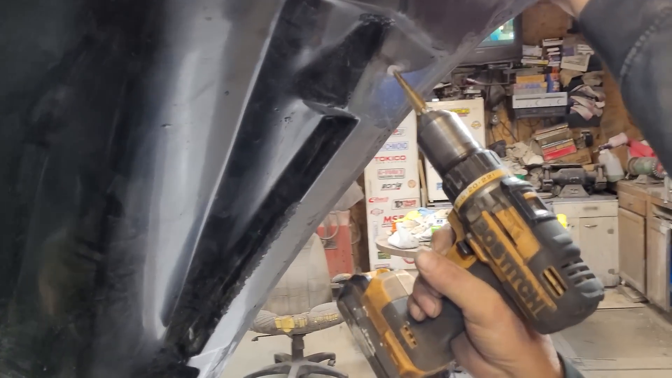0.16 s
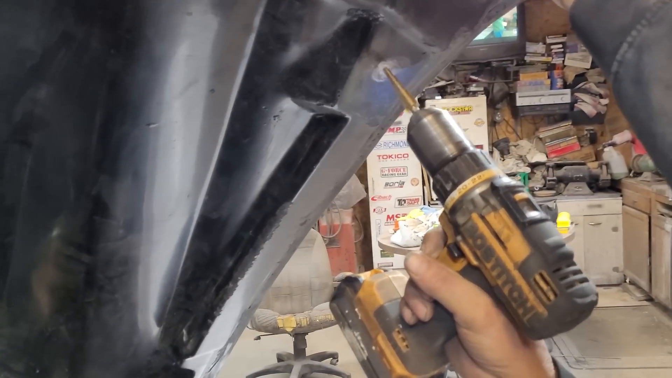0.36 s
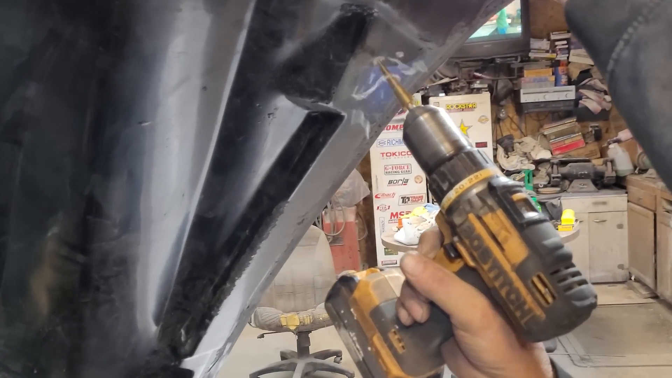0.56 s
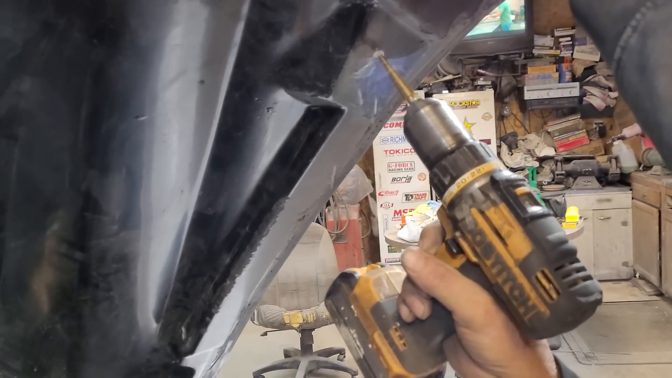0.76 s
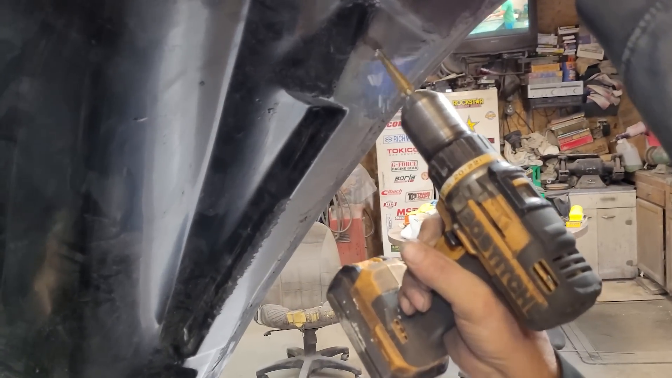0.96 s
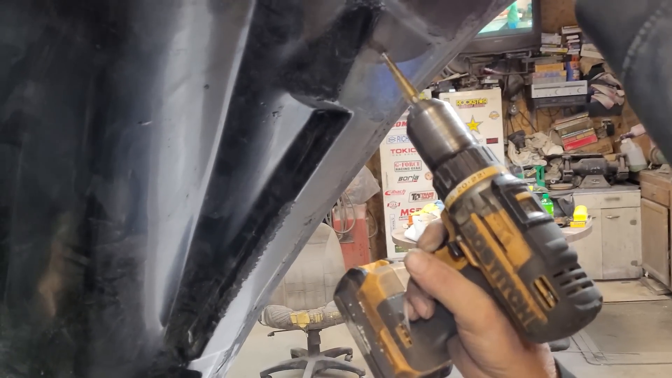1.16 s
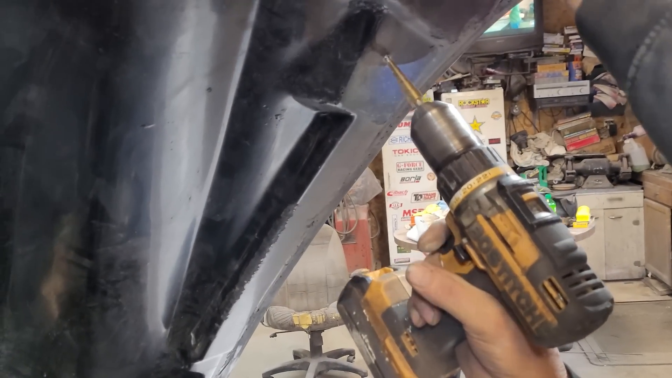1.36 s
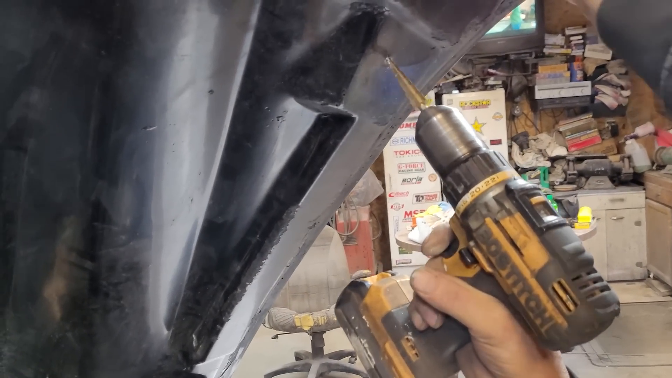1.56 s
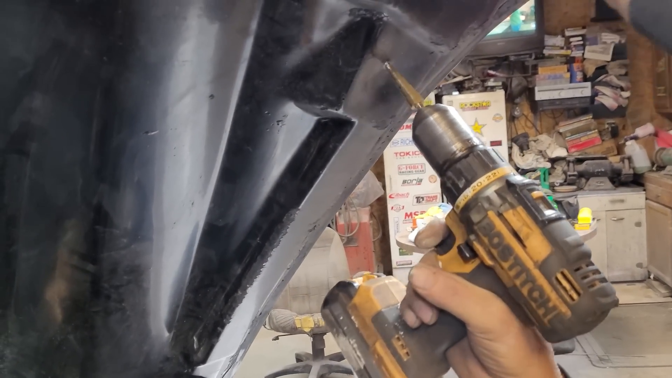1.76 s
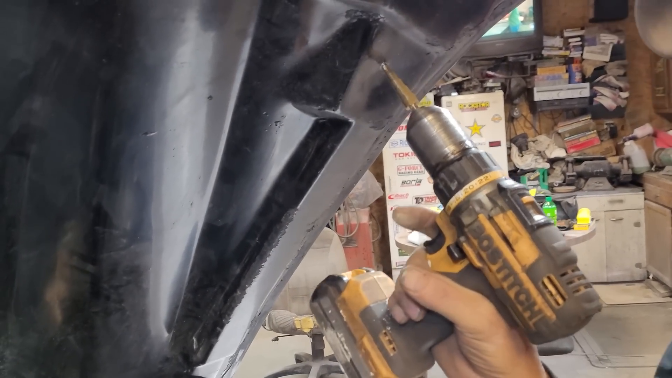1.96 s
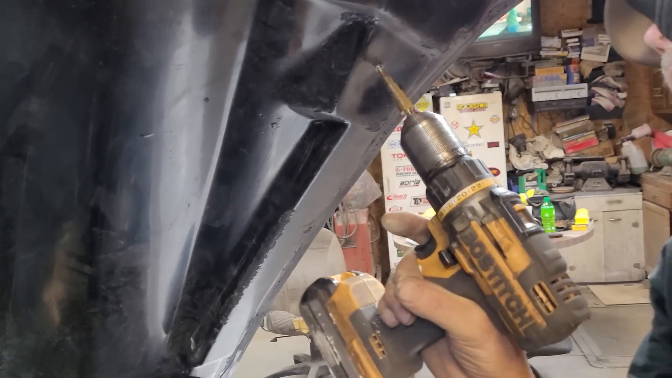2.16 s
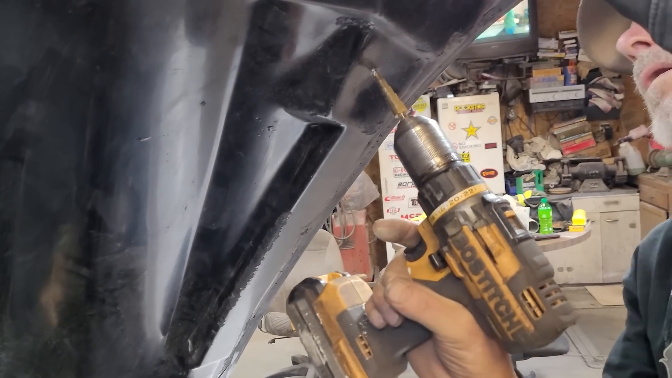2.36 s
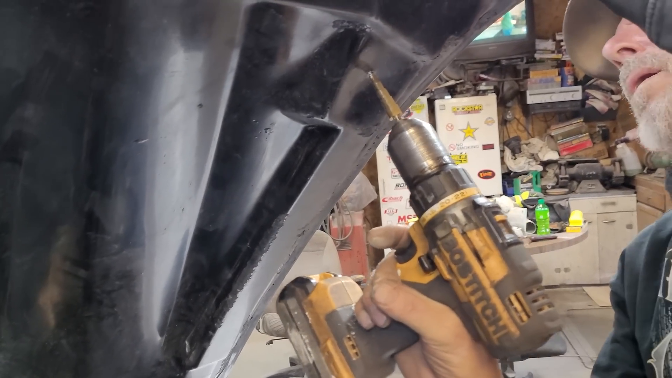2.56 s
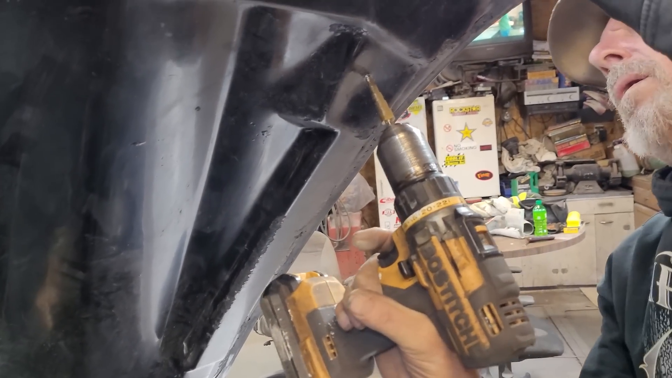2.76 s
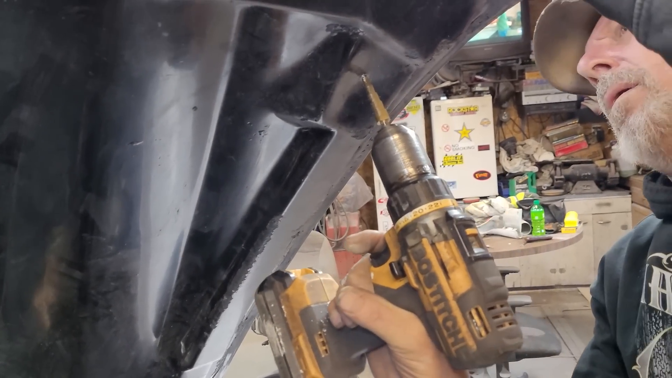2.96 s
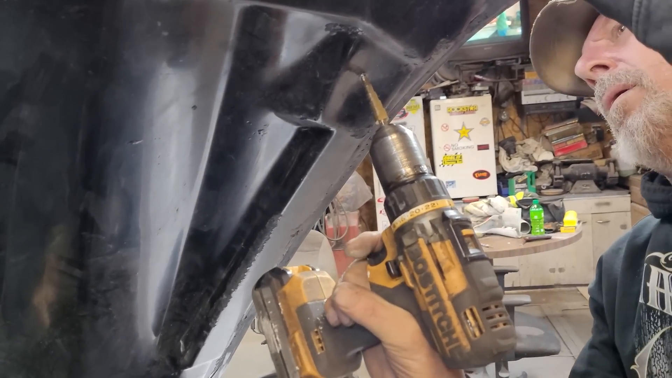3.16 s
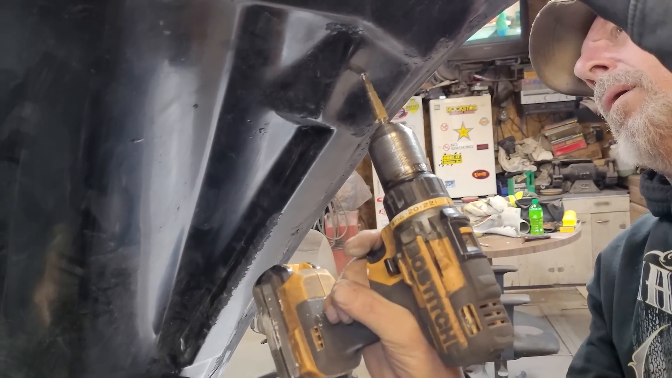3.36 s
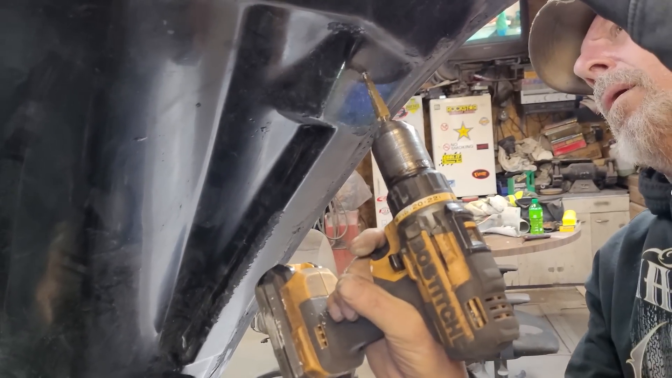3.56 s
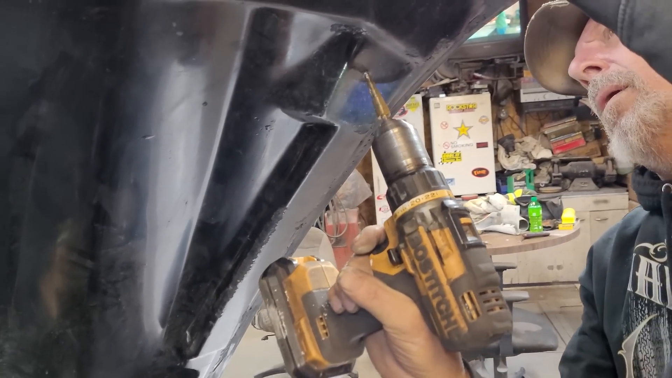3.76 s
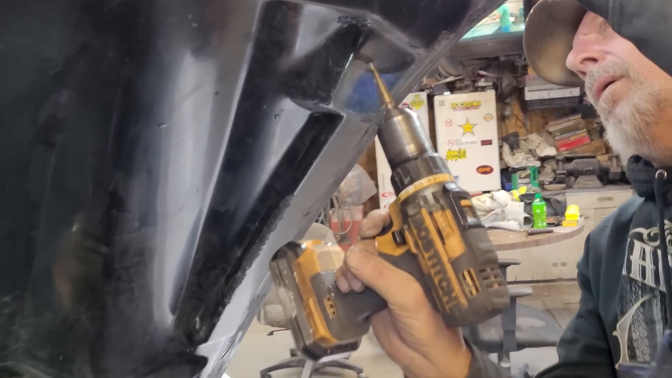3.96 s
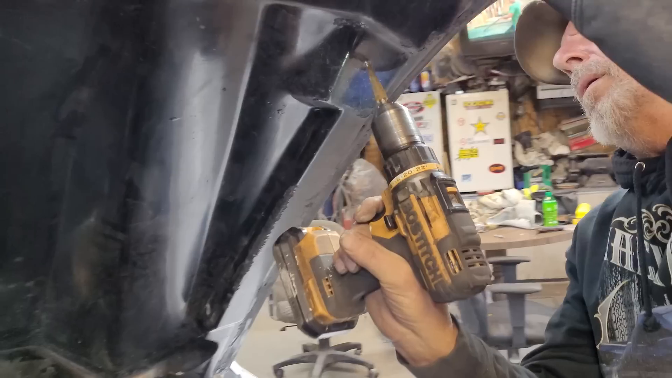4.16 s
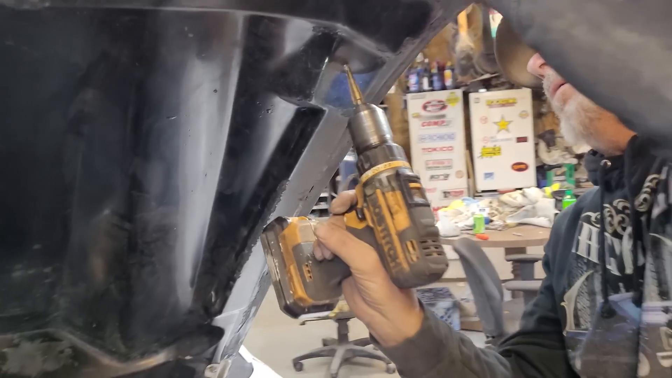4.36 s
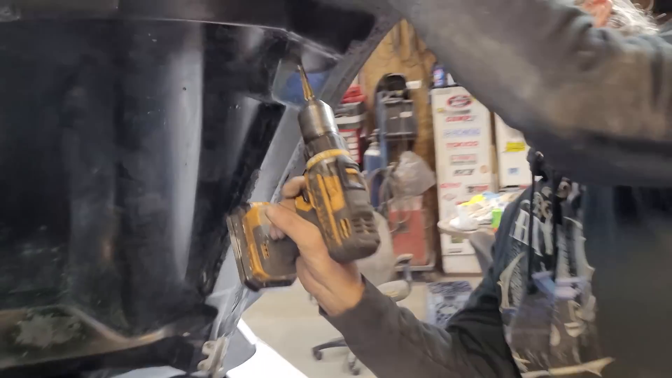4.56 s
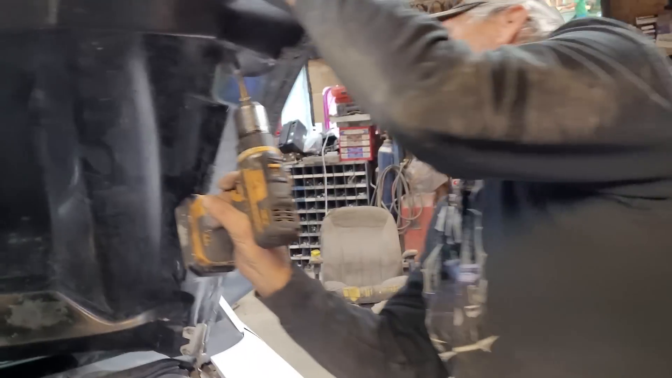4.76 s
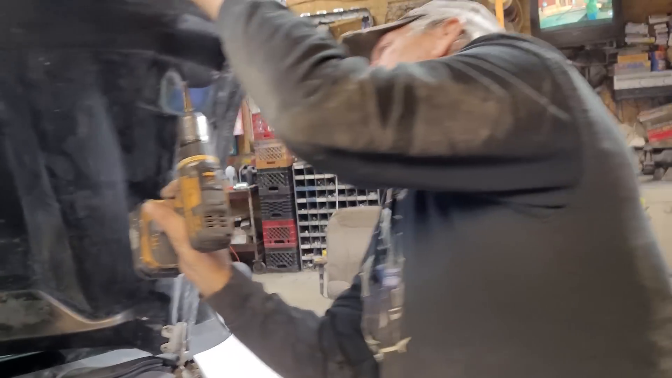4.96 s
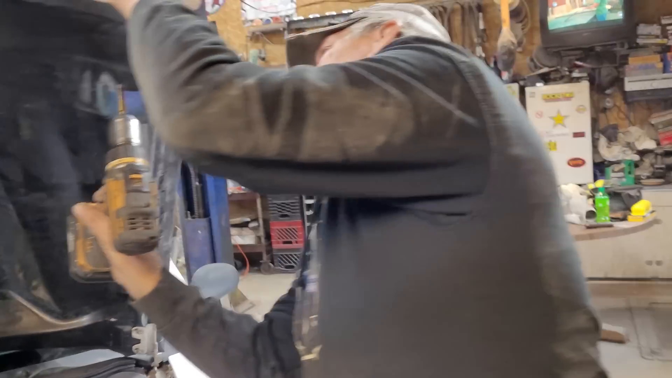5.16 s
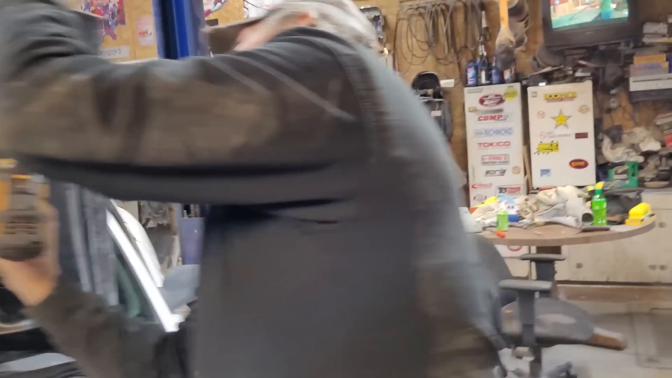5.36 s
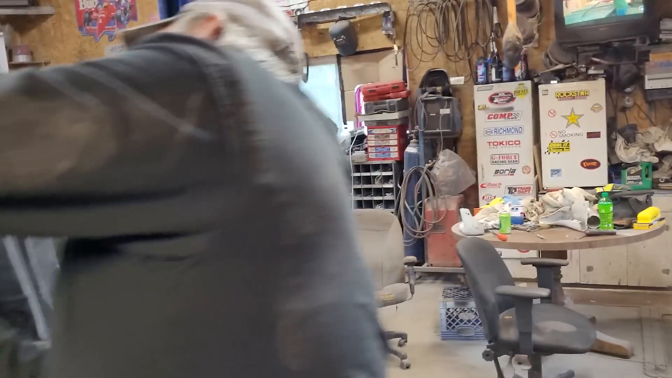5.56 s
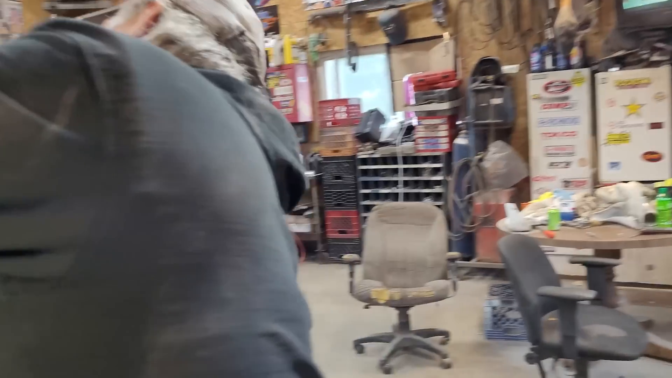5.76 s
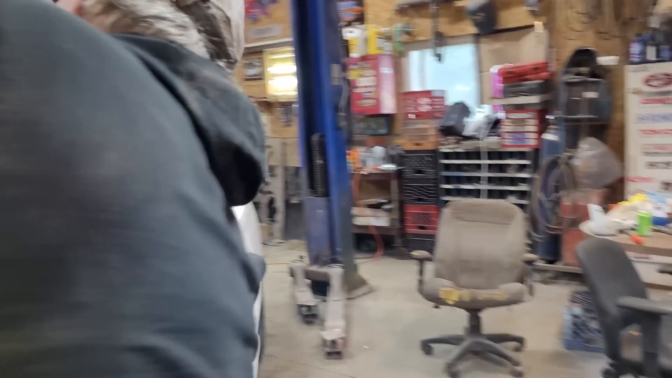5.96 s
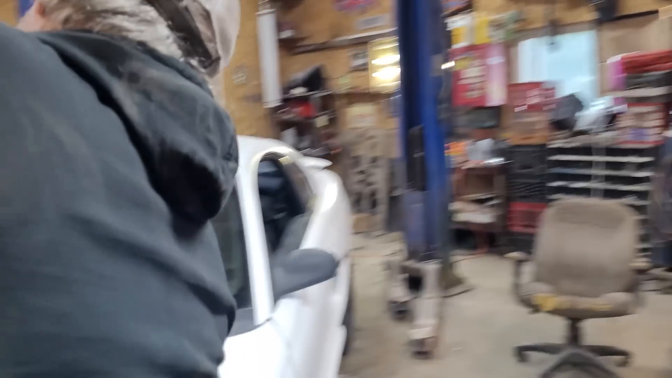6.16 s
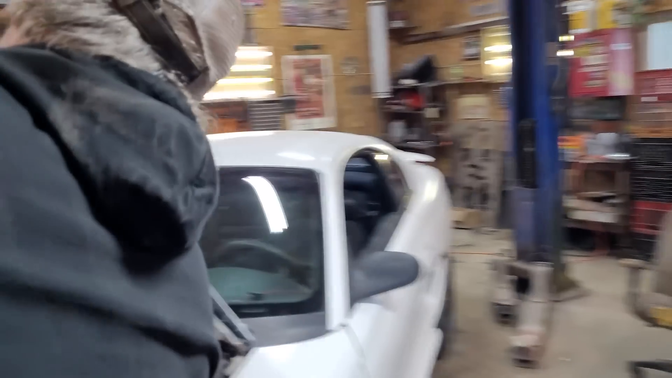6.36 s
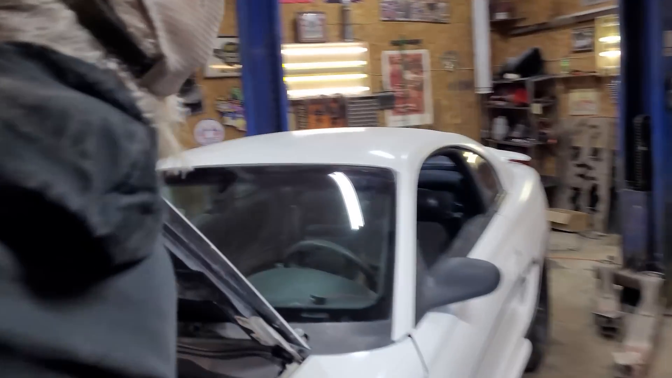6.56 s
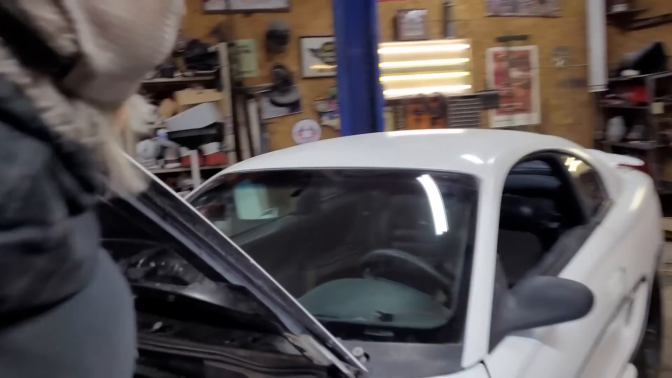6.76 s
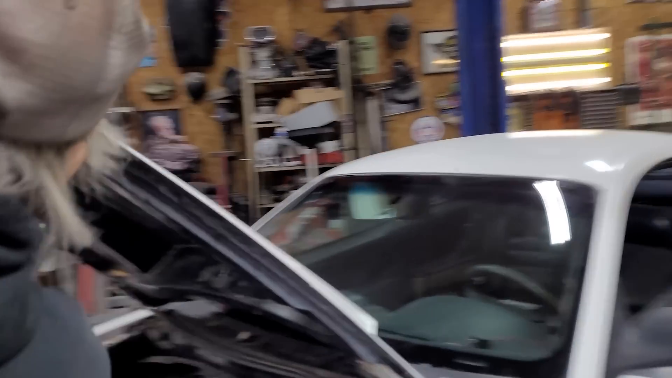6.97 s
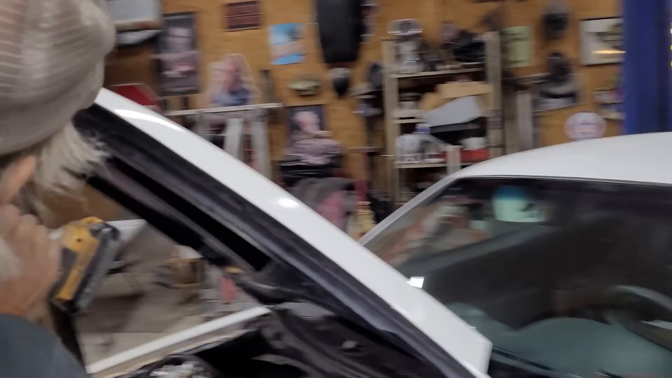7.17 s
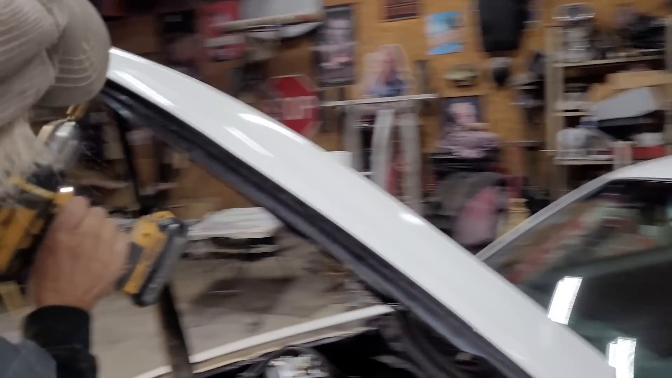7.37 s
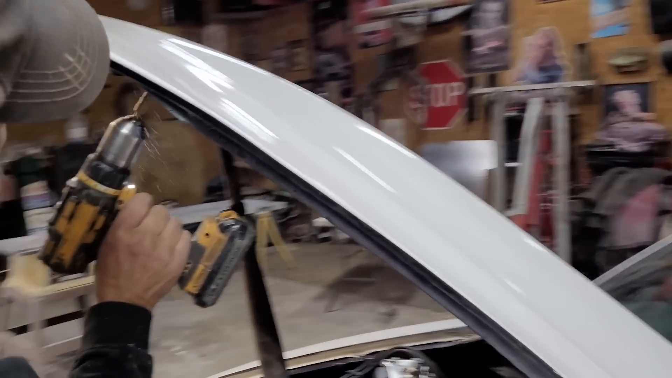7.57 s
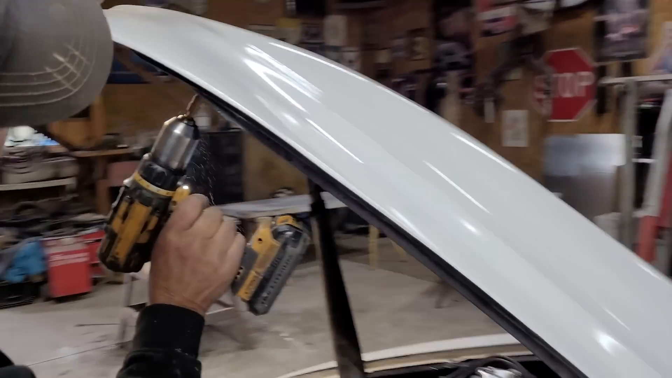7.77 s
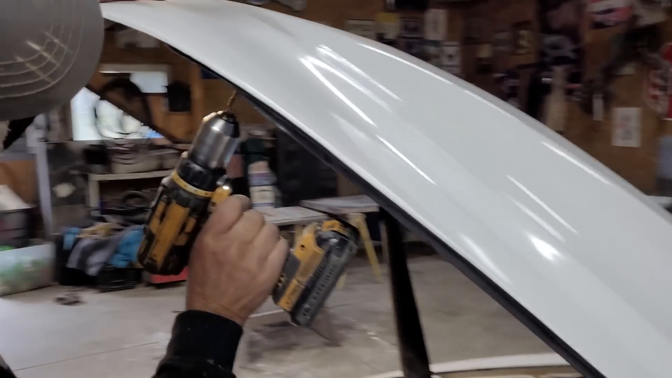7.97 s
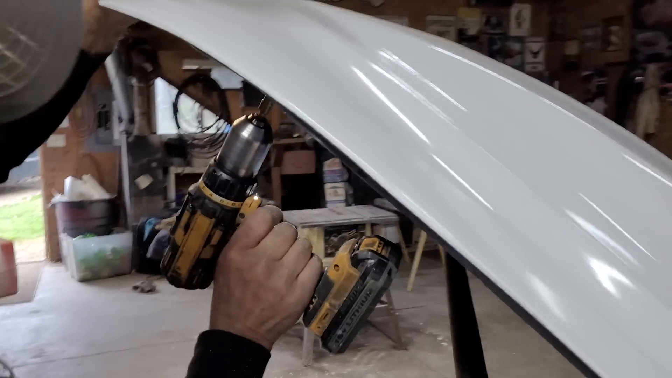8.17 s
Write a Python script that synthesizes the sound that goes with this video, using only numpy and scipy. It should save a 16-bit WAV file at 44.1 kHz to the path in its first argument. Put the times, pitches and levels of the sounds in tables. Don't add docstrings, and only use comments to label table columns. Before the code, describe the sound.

Handheld phone close to a drill on a car hood. The motor whines steadily while the thin panel drones and buzzes, then the pitch falls away with clanking catches. For two seconds only tip scuffs, grainy dragging, a tiny squeak and dull hand bumps remain over faint room noise. Drilling resumes lower and rougher, then surges to full speed, treble sweeping as the phone moves, until the bit snaps through and spins looser.

```python
import sys
import numpy as np
from scipy import signal
from scipy.fft import rfft, irfft, next_fast_len
from scipy.io import wavfile
from scipy.ndimage import uniform_filter1d, map_coordinates

SR = 44100
rng = np.random.default_rng(int(sys.argv[2]) if len(sys.argv) > 2 else 0)


def file_out(sig):
    cols = np.atleast_2d(sig).T
    lim = np.clip(cols, -1, 1)
    pcm = np.round(lim * 32767).astype(np.int16)
    wavfile.write(sys.argv[1], SR, pcm)


def linear_from_db(decibels):
    return 10 ** (np.asarray(decibels, float) / 20)


N = 362943
MESH_PER_ROTOR, MESH_PER_FLUTE = 12, 89.9
SHOP_T60_S, NEAR_T60_S = .35, .05

# (time [s], gear mesh [Hz], mesh whine [dB])
THROTTLE_STAGES = [
    [(0, 3941, -33), (.26, 3925, -44.5), (.5, 3943, -40), (1.07, 3925, -45), (1.19, 3591, -39.5),
     (1.31, 3560, -44), (1.45, 2970, -41.5), (1.76, 1767, -44), (1.8, 1520, -73)],
    [(3.88, 1900, -90), (3.94, 1850, -43), (4.0, 1958, -37), (4.12, 2152, -39.5), (4.5, 2385, -39),
     (4.7, 2305, -46.5), (4.9, 2242, -52), (4.97, 2603, -55), (5.28, 2640, -57)],
    [(5.29, 3860, -53), (5.42, 3883, -37), (5.7, 3915, -39), (6.2, 3917, -45), (6.8, 3888, -45),
     (6.97, 3915, -39.5), (7.5, 3837, -34.5), (7.76, 4023, -38.5), (8.23, 4013, -42)],
]
# (frequency [Hz], width [Hz], level [dB])
BOOM_MODES = [(164.7, 12, -3), (211, 11, -4), (234.9, 11, 3.5), (255, 20, 5), (276.4, 13, 1.5),
              (300, 26, -3), (337.3, 14, 0.5), (390.4, 10, -4), (439, 11, -17)]
# (time [s], left lag [samples], left minus right
# [dB], shading by a shoulder [dB])
DRILL_BEARING = [(0, 4, -3, 0), (.7, -2.5, 0.5, -2), (1.2, -14.5, -1, 0.5), (2, -5, -1, -5.5),
                 (2.7, 10, -1.5, -9), (3.3, -1, -2, -7), (3.42, 8.5, 12.5, -9), (3.65, -5.5, -2, -5.5),
                 (4.7, -4, -1, 1), (5.7, -17, -1, 5), (6.3, -14, -0.5, -3.5), (7.3, -10, -1, -2.5),
                 (8.2, -8, -1, 1.5)]
# (time [s], extra path [ms], share left [1], share right [1], rotor orders [dB])
HOOD_MIRROR = [(5.05, .8, 0, 0, -5), (5.2, .7, .6, .1, 0), (5.35, .56, .7, .1, 3), (5.5, .47, .7, .2, 2),
               (5.7, .4, .7, .2, 2), (5.9, .38, .7, .1, 2), (6.2, .33, .5, 0, -2), (6.35, .31, 0, 0, -6),
               (6.9, .27, 0, 0, -7), (7.3, .225, .3, .3, -7), (7.8, .195, .35, .35, -7),
               (8.23, .18, .15, .15, -7)]


def in_time(rows):
    s, *columns = np.transpose(rows)
    return [np.interp(np.arange(N) / SR, s, c) for c in columns]


def rms_one(x):
    return x / np.sqrt(np.mean(x ** 2) + 1e-20)


def at_hz(points, hz):
    point_hz, value = np.transpose(points)
    return np.interp(np.log(hz + 1), np.log(point_hz), value)


def drift(rate_hz):
    r = np.exp(-80 * np.pi * rate_hz / SR)
    slow = signal.lfilter([1], [1, -2 * r, r * r], rng.standard_normal(N // 40 + 2002))[2000:]
    return np.interp(np.arange(N) / 40, np.arange(len(slow)), rms_one(slow))


def coloured(spectrum):
    size = next_fast_len(N)
    hz = np.fft.rfftfreq(size, 1 / SR)
    (low_hz, low_db), (high_hz, high_db) = spectrum[0], spectrum[-1]
    ends = [(low_hz * .8, low_db - 30), *spectrum, (high_hz * 1.2, high_db - 30)]
    white = rfft(rng.standard_normal(size))
    return rms_one(irfft(white * linear_from_db(at_hz(ends, hz)), size)[:N])


def body(force, modes):
    out = 0
    for k, (hz, width_hz, db) in enumerate(modes):
        r = np.exp(-np.pi * width_hz / SR)
        zeros = [(1 - r * r) / 2, 0, -(1 - r * r) / 2]
        poles = [1, -2 * r * np.cos(2 * np.pi * hz / SR), r * r]
        out = out + (-1) ** k * linear_from_db(db) * signal.lfilter(zeros, poles, force + 1e-18)
    return out


def motor_speed():
    spin_up_s = .055
    first, *later = THROTTLE_STAGES
    stop_s, start_s = first[-1][0], later[0][0][0]
    still = [(stop_s + .05, 0, -120), (start_s - .08, 0, -120), (start_s - .002, 0, -60)]
    asked_hz, mesh_db = in_time(np.vstack([first, still, *later]))
    r = np.exp(-1 / (spin_up_s * SR))
    mesh_hz = signal.lfilter([1 - r], [1, -r], asked_hz, zi=[r * asked_hz[0]])[0]
    return mesh_hz, mesh_db


def effort():
    # (time [s], feed of the bit into the panel [dB], motor [dB])
    stages = [
        [(0, -30.5, -30.5), (.8, -25, -30.5), (.95, -22, -28.5), (1.12, -21.5, -33), (1.26, -29.5, -35.5),
         (1.48, -37, -36), (1.54, -22.5, -33.5), (1.785, -27, -38), (1.805, -30.5, -48)],
        [(3.8, -81, -101), (3.812, -54.5, -68), (3.84, -43, -36), (3.91, -32, -34), (4.01, -25.5, -35),
         (4.5, -22, -37), (5.02, -24, -42), (5.28, -22.5, -40.5)],
        [(5.44, -20, -38), (5.6, -22.5, -40), (5.97, -27, -41), (6.3, -25.5, -41), (6.67, -27.5, -40),
         (7.2, -25, -40), (7.55, -28, -34), (7.66, -21, -37.5), (7.86, -31, -38.5), (8.23, -29.5, -36.5)],
    ]
    panel_settles_db_per_s, motor_dies_db_per_s = 39, 140
    first, *later = stages
    s, feed_db, motor_db = first[-1]
    quiet = (s + 1, feed_db - panel_settles_db_per_s, motor_db - motor_dies_db_per_s)
    return in_time(np.vstack([first, quiet, *later]))


def jolts():
    # (time [s], ring [dB], sway [dB], fade [s])
    jolt_rows = [(.05, -42, -35.5, 0.11), (.42, -45, -38, 0.27), (2.85, -75, -67, 0.085),
                 (4.6, -34, -39, 0.19), (.82, -34, -51.5, 0.074), (1.0, -21, -23.5, 0.12),
                 (1.732, -31, -37, 0.089), (2.01, -47, -41, 0.14), (2.34, -74, -57, 0.037),
                 (2.55, -64, -54, 0.084), (3.401, -87, -60, 0.11), (3.98, -31, -37.5, 0.23),
                 (4.18, -39.5, -35, 0.027), (4.29, -38, -32.5, 0.022), (5.36, -53, -48, 0.065),
                 (7.592, -28, -23, 0.041)]
    rise_s = .02
    t = np.arange(N) / SR
    gains = np.zeros((2, N))
    for s, ring_db, sway_db, fade_s in jolt_rows:
        shape = np.exp(-np.maximum((s - t) / rise_s, (t - s) / fade_s))
        gains += shape * linear_from_db([[ring_db], [sway_db]])
    return gains


def evenness(mesh_hz, jolt):
    even_top, upset_hz_per_s, upset_db = .96, 1200, -27
    first_hole_even = 0.64
    break_through_s, free_even = 7.57, 0.34
    change_hz_per_s = uniform_filter1d(np.abs(np.gradient(mesh_hz)) * SR, SR // 5)
    ragged = np.where(np.arange(N) < THROTTLE_STAGES[1][0][0] * SR, first_hole_even, 1)
    ragged[round(break_through_s * SR):] = free_even
    return ragged * even_top / (1 + change_hz_per_s / upset_hz_per_s + jolt / linear_from_db(upset_db))


def flute_beat(turn):
    # (frequency [Hz], level [dB])
    hood_response = [(40, -9.5), (87, -15.5), (105, -3), (130, -10), (173, -5.5), (220, -3), (260, -2),
                     (300, -6), (347, -1.5), (392, -2.5), (440, -5.5), (520, -8), (600, -16.5), (720, -21),
                     (900, -36)]
    # (time [s], frequency [Hz], lift [dB], lift of every fourth harmonic [dB])
    facing = [(0, 260, 13.5, 11), (1.1, 260, 12, 4.5), (4.0, 260, 7.5, 1.5), (4.4, 256, 11, 2),
              (4.65, 234.3, 5.5, 6), (5.1, 255, 13, 7), (5.45, 213.7, 4, 14), (5.75, 249.9, 8.5, 2.5),
              (5.95, 410, 4, 0.5), (6.4, 430.1, 2, 0.5), (6.6, 300, 4.5, 2.5), (7.0, 309.6, 11.5, 5),
              (7.4, 295.8, 6.5, 0), (8.23, 300, 3, 12)]
    facing_octaves, odd_db, waver_db = .4, -15, 2.2
    turn_hz, out = np.gradient(turn)[::8] * SR, 0
    facing_hz, facing_db, planet_db = (c[::8] for c in in_time(facing))
    for k in range(2, 36):
        octaves_off = np.log2((k * turn_hz + 1) / facing_hz)
        db = facing_db * np.exp(-(octaves_off / facing_octaves) ** 2) + at_hz(hood_response, k * turn_hz)
        db = db + odd_db * (k % 2) + planet_db * (k % 4 == 0) + waver_db * drift(1.7)[::8]
        out = out + linear_from_db(db) * np.sin(2 * np.pi * (k * turn[::8] + rng.random()))
    out = signal.resample_poly(out, 8, 1)[:N]
    return out / np.sqrt(uniform_filter1d(out ** 2, SR // 4) + 1e-9)


def cutting(mesh_hz, even, boom_db, ring_db):
    # (frequency [Hz], width [Hz], level [dB])
    ring_modes = [(501.4, 31, -1), (534, 19, -2), (556.6, 37, 0), (660, 56, -5.5), (700, 25, -2),
                  (798, 111, -7.5), (906, 130, -4), (937, 110, -6)]
    bite, lumpy_db = 0.23, 1.5
    panel_top_hz = 1700
    turn = np.cumsum(mesh_hz / MESH_PER_FLUTE / 2 / SR)
    swell = np.exp(bite * np.cos(4 * np.pi * turn) / 2)
    torn = rng.standard_normal(N) * swell * linear_from_db(lumpy_db * drift(38))
    share = even * (mesh_hz > 1000)
    loose = np.sqrt(1 - share ** 2)
    boom = share * flute_beat(turn) + loose * rms_one(body(torn, BOOM_MODES))
    panel = linear_from_db(boom_db) * boom + linear_from_db(ring_db) * rms_one(body(torn, ring_modes))
    return signal.sosfilt(signal.butter(4, panel_top_hz, fs=SR, output="sos"), panel)


def panel_sway(feed_db, even, jolt):
    # (frequency [Hz], density [dB per Hz])
    sway_colour = [(40, -11.5), (54, -9), (70, -1.5), (105, -3), (140, -8), (220, -30), (500, -95)]
    sway_db, calm_db, wander_db = -14, -12, 2.5
    swell = linear_from_db(feed_db + sway_db + calm_db * even + wander_db * drift(1.7))
    return np.hypot(swell, jolt) * coloured(sway_colour)


def whine(mesh_hz, mesh_db, hiss_db):
    # (multiple [1], level over the fan hiss [dB])
    rotor_orders = [(11, -25), (15, -15), (21, -25), (22, -23), (24, -18), (31, -24), (32, -24), (33, -24),
                    (34, -25), (36, -24), (37, -23), (38, -23), (39, -23), (40, -21), (41, -25), (45, -23),
                    (47, -24)]
    # (time [s], length [s], level [dB])
    nulls = [(0.946, .02, -8), (1.064, 0.018, -5), (1.33, 0.033, -12), (4.03, .02, -9.5), (5.497, .02, -9),
             (5.6, 0.046, -17), (5.833, 0.047, -20), (6.16, 0.026, -2), (6.369, 0.033, -7),
             (6.887, 0.043, -12), (7.106, .03, -11), (7.43, .03, -5.5), (7.869, 0.019, -9),
             (8.13, .05, -16)]
    waver_db, wobble, strain_db = .7, .0016, 1.5
    free_hz, free_order, free_db = 3990, 9, -50
    t = np.arange(N) / SR
    phase = 2 * np.pi * np.cumsum(mesh_hz * (1 + wobble * drift(25)) / MESH_PER_ROTOR / SR)
    full = np.clip((mesh_hz - 2900) / 600, 0, 1)
    strain = np.clip(uniform_filter1d(np.gradient(mesh_hz) * SR, SR // 20) / 2500, 0, 1)
    mesh_db = mesh_db + sum(db * np.exp(-((t - s) / length_s) ** 2) for s, length_s, db in nulls)
    out = linear_from_db(mesh_db + (1.5 + full) * waver_db * drift(7.8)) * np.sin(MESH_PER_ROTOR * phase)
    for order, db in rotor_orders:
        order_db = hiss_db + db + strain_db * strain + 4.0 * drift(6.0) - 4.5
        out += full * linear_from_db(order_db) * np.sin(order * phase + order)
    free = np.clip((mesh_hz - free_hz) / 30, 0, 1)
    out += free * linear_from_db(free_db) * np.sin(free_order * phase)
    return np.sqrt(2) * out, phase


def grind_and_fan(phase, motor_db, shade_db, hiss_db):
    # (frequency [Hz], density [dB per Hz])
    grind_colour = [(500, -31.5), (850, 2), (934, -13.5), (1040, 0.5), (1170, -6.5), (1500, -3.5),
                    (2350, -4), (3290, -9), (3800, -7.5), (4940, -25), (8360, -120)]
    sizzle_colour = [(2470, -17.5), (4200, -2.5), (4350, -5.5), (5050, -3.5), (6220, -8), (7580, -5.5),
                     (9500, -23), (12400, -33.5), (20900, -120)]
    hiss_colour = [(5290, -33.5), (9000, -15), (9580, -13.5), (10500, -5.5), (13000, -6), (15600, -2),
                   (16000, -12)]
    grind_db = motor_db - 2.15 + .1 * shade_db
    sizzle_db = motor_db - 4.5 + 0.6 * shade_db
    rotor = np.cos(phase)
    bite = 1 + 0.19 * np.cos(phase * MESH_PER_ROTOR / MESH_PER_FLUTE)
    grind = coloured(grind_colour) * (1 + 1.2 * rotor) * bite * linear_from_db(grind_db + 2.1 * drift(68))
    flicker_db = 0.52 * drift(35)
    sizzle = coloured(sizzle_colour) * (1 + 1.1 * rotor) * linear_from_db(sizzle_db + flicker_db)
    hiss = coloured(hiss_colour) * (1 + 0.45 * rotor) * linear_from_db(hiss_db + flicker_db)
    return grind + sizzle + hiss


def screen_whistle(hiss_db):
    screen_hz, screen_db = 15733, -62.5
    t = np.arange(N) / SR
    tone = np.sin(2 * np.pi * screen_hz * t) + linear_from_db(-25.5) * np.sin(np.pi * screen_hz * t)
    return np.sqrt(2) * linear_from_db(screen_db + 0.073 * (hiss_db + 77) + 3.0 * drift(8)) * tone


def shop_floor():
    # (frequency [Hz], density [dB per Hz])
    floor_colour = [(24, -35), (40, -11.5), (111, -4.5), (169, -15), (502, -4.5), (888, -11), (1350, -9.5),
                    (1490, -16), (1960, -18), (12600, -33.5), (15000, -31)]
    return linear_from_db(-73) * np.array([coloured(floor_colour), coloured(floor_colour)])


def snags():
    # (time [s], crack [dB], boom [dB], boom [Hz], brightness [dB])
    snag_rows = [(1.5128, -12.5, -25, 523, 13), (1.5185, -33.5, -26, 600, 7), (1.5235, -29, -31, 700, -6),
                 (1.527, -22, -32.5, 617, -15), (1.537, -35.5, -24.5, 290, -14.5),
                 (1.6247, -20, -29, 700, 16), (1.629, -13.5, -30, 700, 2), (1.634, -21, -27.5, 2210, -7),
                 (1.756, -26.5, -32, 1997, -8), (1.768, -29.5, -45, 920, -22), (1.7862, -21.5, -31, 300, 9),
                 (1.978, -43.5, -43, 593, -28), (3.81, -51, -51, 1300, 8.5), (3.833, -35, -42, 700, -15),
                 (7.568, -14.5, -27.5, 1000, -17.5), (7.575, -33, -11, 331.4, -17),
                 (7.625, -30, -31, 790, -33), (.995, -24, -37.5, 2370, -14), (1.09, -21, -39, 2200, -12),
                 (1.546, -38, -25.5, 255, -21.5)]
    # (time [s], boom [dB], boom [Hz], length [s])
    bumps = [
        (2.309, -58, 243, 0.018),
        (2.583, -64, 257, 0.0086),
        (2.795, -62, 255, 0.014),
        (3.399, -58.5, 48.1, 0.058),
        (3.467, -75, 261, .019),
    ]
    # (frequency [Hz], width [Hz], level [dB])
    clank_modes = [(600, 250, 5), (944, 300, 14.5), (1400, 260, 13.5), (2130, 620, 12), (3120, 560, 9.5),
                   (3680, 1400, 5), (4600, 640, -12.5), (5500, 900, -12.5), (8140, 690, -12),
                   (11100, 1600, -29), (14200, 1800, -14)]
    crunch_s, bump_crack_db, bump_bright_db = 0.0069, -37, -22
    t, out = np.arange(SR // 4) / SR, np.zeros(N + SR)
    hard = [(*row, crunch_s) for row in snag_rows]
    soft = [(s, db + bump_crack_db, db, hz, bump_bright_db, length_s) for s, db, hz, length_s in bumps]
    for s, crack_db, boom_db, boom_hz, bright_db, length_s in hard + soft:
        fade = np.exp(-t / length_s)
        crunch = rng.standard_normal(len(t)) * rng.exponential(1, len(t)) * fade
        crunch[0] += 7.0
        spread_db = rng.normal(0, 2, len(clank_modes))
        tilted = [(hz, width_hz, db + bright_db * np.log2(hz / 1500) / 3 + own_db)
                  for (hz, width_hz, db), own_db in zip(clank_modes, spread_db)]
        clank = body(crunch, tilted) + 0.067 * linear_from_db(bright_db) * crunch
        push = 2.0 * fade * np.sin(2 * np.pi * boom_hz * t)
        boom = .5 * body(crunch, BOOM_MODES) + body(push + crunch, [(boom_hz, 80, -8)])
        at = round(s * SR)
        out[at:at + len(t)] += 0.8 * linear_from_db(crack_db) * clank + 5.6 * linear_from_db(boom_db) * boom
    return out[:N]


def scuffs():
    # (time [s], level [dB], length [s])
    strokes = [(1.83, -61, 0.019), (1.88, -49, .022), (1.943, -58, 0.019), (1.976, -46, 0.029),
               (2.058, -57, 0.0034), (2.09, -73, 0.013), (2.133, -46.5, 0.03), (2.244, -54.5, 0.041),
               (2.293, -68, 0.034), (2.416, -61.5, 0.085), (2.645, -53.5, 0.045), (2.766, -70, 0.06),
               (2.92, -76, .08)]
    # (frequency [Hz], density [dB per Hz])
    scuff_colour = [(900, 0), (1500, 2.5), (2500, -1), (4500, -7.5), (7000, -8.5), (9000, -19),
                    (12000, -9.5), (15500, -15)]
    t = np.arange(N) / SR
    stroke = sum(linear_from_db(db) * np.exp(-((t - s) / length_s) ** 2) for s, db, length_s in strokes)
    return stroke * coloured(scuff_colour)


def rub():
    # (time [s], level [dB])
    drag_rows = [(2.3, -56), (2.45, -80), (2.54, -50.5), (2.62, -54.5), (2.74, -51.5), (3.02, -68.5),
                 (3.24, -80), (3.6, -88.5), (3.67, -72), (3.8, -79)]
    # (frequency [Hz], width [Hz], level [dB])
    rub_modes = [(507, 240, -1.5), (818, 170, 3.5), (1000, 210, -0.5), (1327, 79, 4), (1750, 780, -9.5),
                 (2540, 230, -8), (3300, 700, -19), (4700, 450, -25)]
    # (time [s], pitch [Hz], level [dB])
    squeak_rows = [
        (2.97, 877, -86),
        (3.01, 897, -70),
        (3.1, 921, -66),
        (3.19, 905, -68),
        (3.24, 897, -89.5),
    ]
    t = np.arange(N) / SR
    grit = rng.standard_normal(N) * linear_from_db(1.0 * drift(40))
    dragging = (t > drag_rows[0][0]) * (t < drag_rows[-1][0])
    drag = dragging * linear_from_db(in_time(drag_rows)[0]) * rms_one(body(grit, rub_modes))
    hz, db = in_time(squeak_rows)
    squeaking = (t > squeak_rows[0][0]) * (t < squeak_rows[-1][0])
    phase = 2 * np.pi * np.cumsum(hz * (1 + 0.0056 * drift(30))) / SR
    return drag + squeaking * np.sqrt(2) * linear_from_db(db + 1.5 * drift(20.3)) * np.sin(phase)


def chopper():
    # (time [s], level [dB])
    chop_rows = [(3.806, -46), (3.84, -38.5), (4.1, -32.5), (4.46, -46.5), (4.6, -57), (4.82, -52),
                 (4.96, -38.5), (5.14, -52), (5.3, -53)]
    chop_hz, attack_s = 4097.5, .008
    t = np.arange(N) / SR
    on = np.clip((t - chop_rows[0][0]) / attack_s, 0, 1) * (t < chop_rows[-1][0])
    return np.sqrt(2) * on * linear_from_db(in_time(chop_rows)[0]) * np.sin(2 * np.pi * chop_hz * t)


def mirrored(x):
    path_ms, *share, _ = in_time(HOOD_MIRROR)
    late = np.array([np.interp(np.arange(N) - path_ms * SR / 1000, np.arange(N), side) for side in x])
    bright = signal.sosfilt(signal.butter(2, 1500, "high", fs=SR, output="sos"), late)
    return x + np.array(share) * bright


def ports(x, t60_s, diffuse=1):
    # (frequency [Hz], left minus right [dB])
    balance = [(60, 0), (250, .3), (700, 1.5), (1400, -2.5), (2800, .7), (5600, 2.8), (10000, 4.8),
               (14000, 2.5)]
    # (frequency [Hz], share of sound unlike in the two ports [1])
    unlike = [(30, .22), (70, .12), (130, .03), (260, .05), (450, .12), (800, .4), (1500, .8), (16000, .99)]
    lag, pan_db, _ = in_time(DRILL_BEARING)
    size = next_fast_len(N + SR)
    hz = np.fft.rfftfreq(size, 1 / SR)
    t = np.arange(SR // 2) / SR
    tails = rng.standard_normal((2, len(t))) * linear_from_db(-60 * t / t60_s) * (t > .002)
    dull = signal.lfilter([.16], [1, -1.2, .36], tails)
    tails = dull + (tails - dull) * linear_from_db(-60 * t / NEAR_T60_S)
    walls = rfft(tails / np.sqrt(np.sum(tails[0] ** 2)), size)
    share = np.clip(diffuse * at_hz(unlike, hz), 0, 1)
    out = []
    for side, wall in zip((1, -1), walls):
        late = map_coordinates(x, [np.arange(N) - side * lag / 2], order=3, mode="nearest")
        gain = linear_from_db(side * at_hz(balance, hz) / 2) * (np.sqrt(1 - share ** 2) + share * wall)
        out.append(linear_from_db(side * pan_db / 2) * irfft(rfft(late, size) * gain, size)[:N])
    return np.array(out)


def tone_ports(x):
    skew_rad = np.clip(0.79 + .2 * drift(1.5), -1.2, 1.2)
    turned = np.imag(signal.hilbert(x, next_fast_len(N))[:N])
    return x + np.tan(skew_rad) * turned * [[1], [-1]]


def scene():
    mesh_hz, mesh_db = motor_speed()
    feed_db, motor_db = effort()
    shade_db = in_time(DRILL_BEARING)[2]
    ring_jolt, sway_jolt = jolts()
    even = evenness(mesh_hz, ring_jolt)
    ring = linear_from_db(feed_db - 11.5 + 0.65 * (np.maximum(motor_db, -60) + 40.0))
    ring_db = 20 * np.log10(np.hypot(ring, ring_jolt))
    hiss_db = motor_db + 3 + shade_db
    tones, phase = whine(mesh_hz, mesh_db, hiss_db + in_time(HOOD_MIRROR)[3])
    drill = cutting(mesh_hz, even, feed_db, ring_db) + grind_and_fan(phase, motor_db, shade_db, hiss_db)
    sway = panel_sway(feed_db, even, sway_jolt)
    steady = mirrored(ports(drill + sway, SHOP_T60_S))
    hits = ports(snags() + scuffs() + rub(), NEAR_T60_S, 0.7)
    pure = tone_ports(tones + screen_whistle(hiss_db) + chopper())
    return steady + hits + pure + shop_floor()


def roll_off(x):
    return signal.sosfilt(signal.butter(12, 17050, fs=SR, output="sos"), x)


def record(dry):
    top_hz = 15900
    mix = signal.sosfilt(signal.ellip(12, .5, 60, top_hz, fs=SR, output="sos"), dry)
    return roll_off(mix)


dry = scene()
out = record(dry)
file_out(out)
```